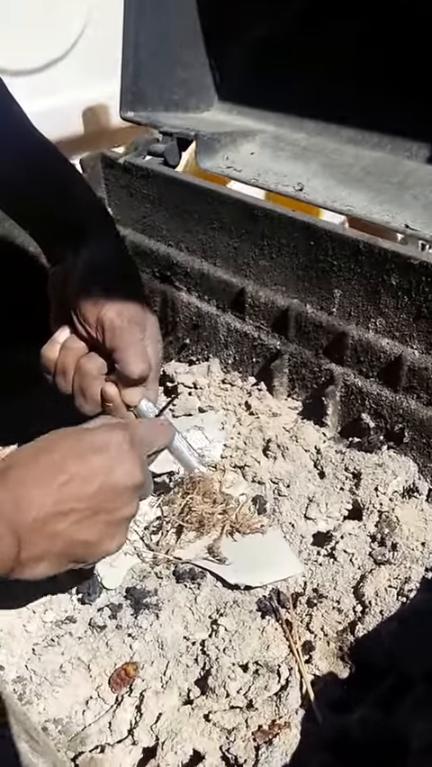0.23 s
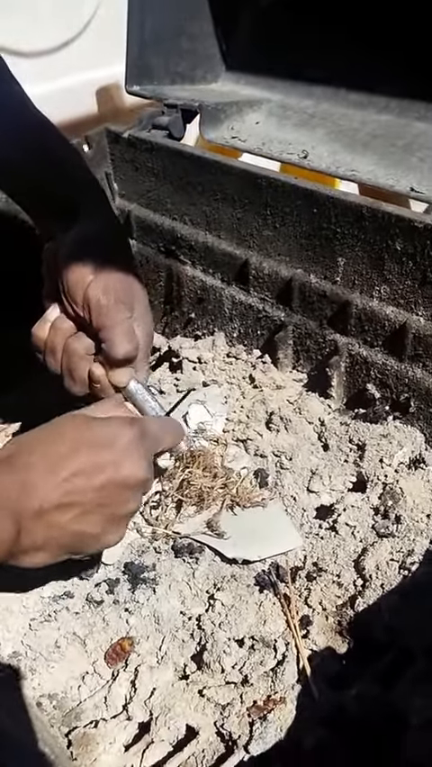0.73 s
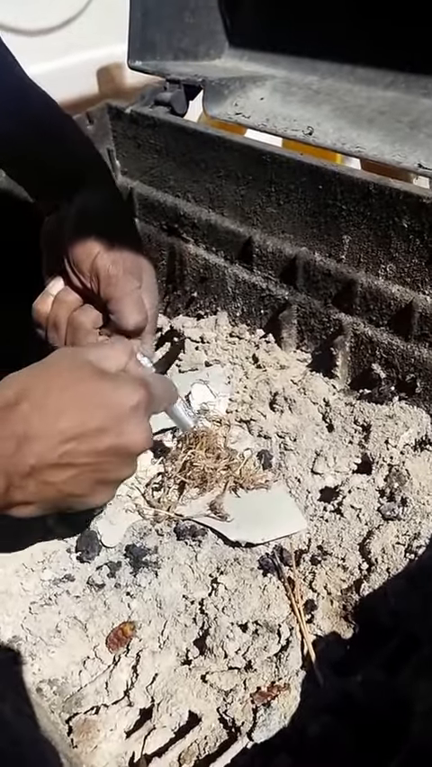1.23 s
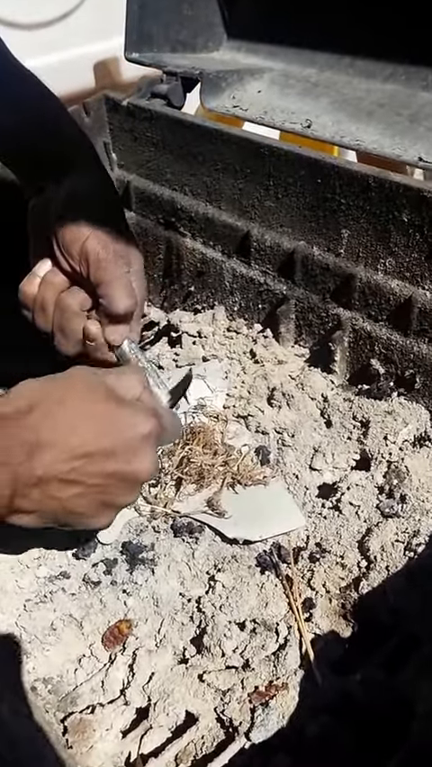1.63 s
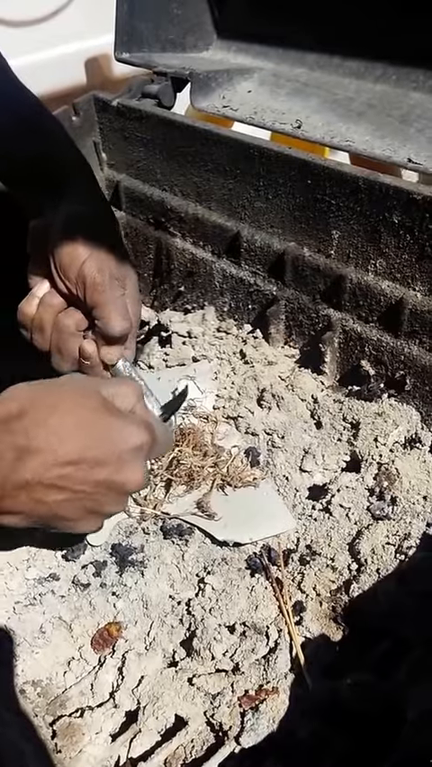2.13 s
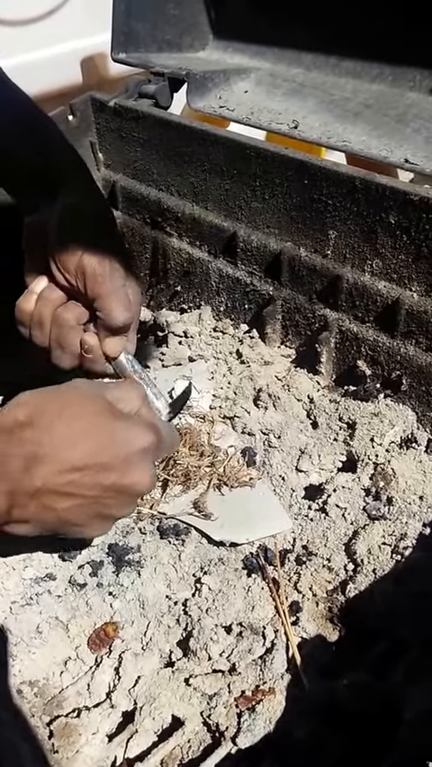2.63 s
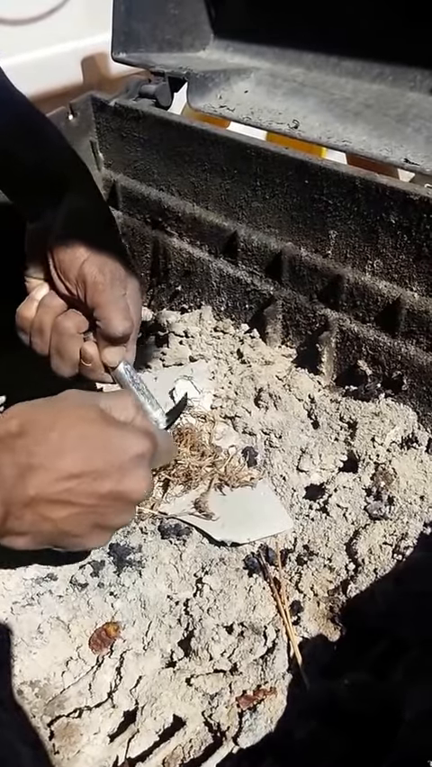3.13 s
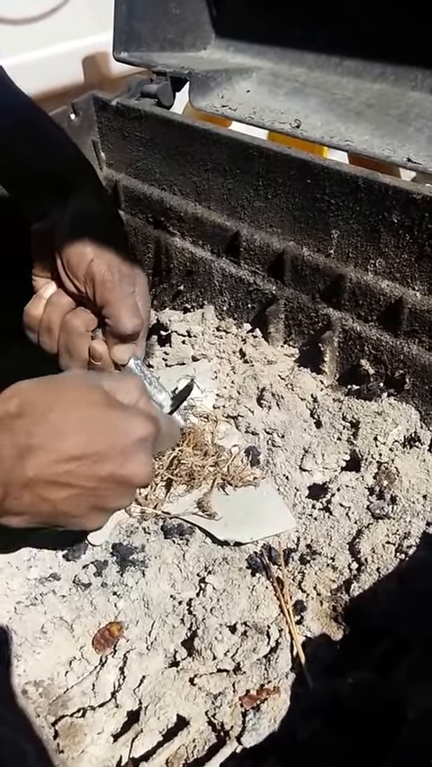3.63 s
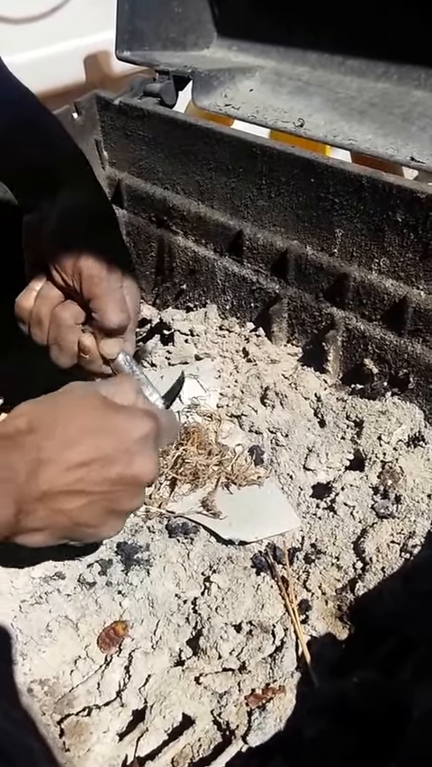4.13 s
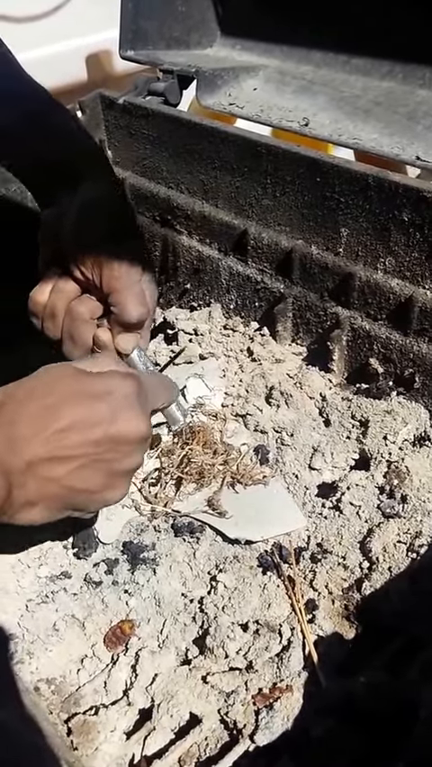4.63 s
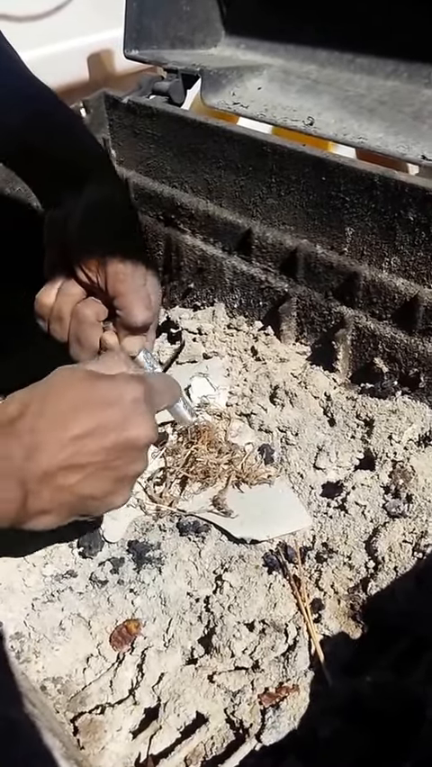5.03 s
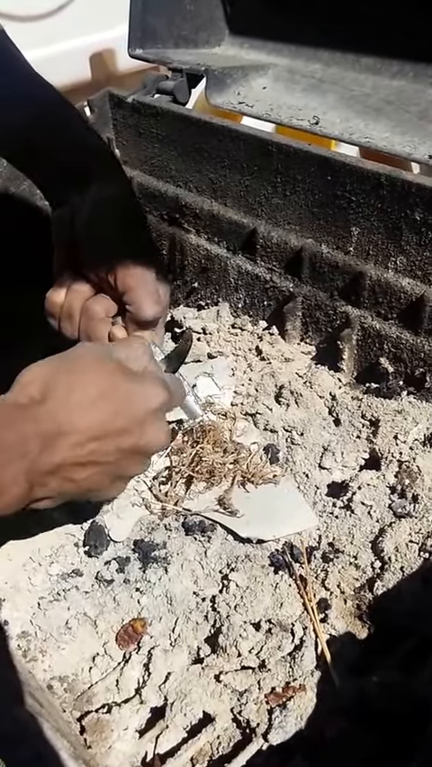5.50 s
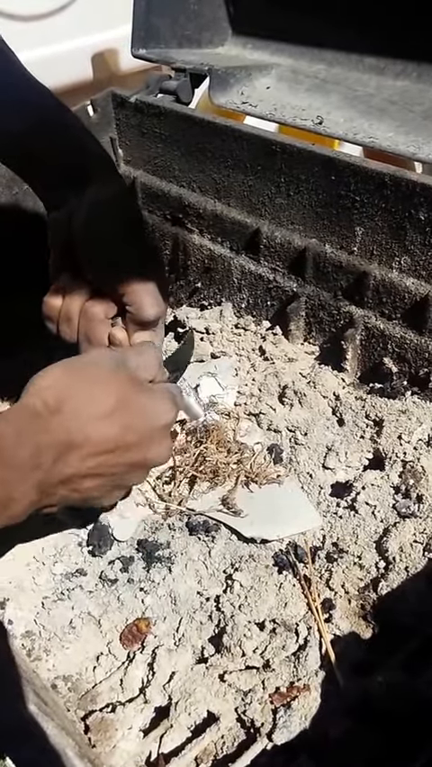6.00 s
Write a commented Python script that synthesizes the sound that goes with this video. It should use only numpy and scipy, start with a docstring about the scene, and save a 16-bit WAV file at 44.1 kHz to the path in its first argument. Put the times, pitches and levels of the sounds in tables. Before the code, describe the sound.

Fast, sharp metallic scraping, a steady run of short fizzy zips with a faint dry rasp, close up in open air with small gusts.

```python
"""A steel blade scrapes a magnesium rod in quick hard strokes, about twelve a second, in a charcoal grill outdoors.
Each stroke is shaped noise: a bright hiss and fizz from the edge, a lower rasp as it digs in.
The strokes also ring the blade's decaying modes and short low tones in the rasp; catches add short sine bursts.
Decaying noise echoes the grill and yard; filtered noise makes air and gusts, a wavering sine a faint hum.
A limiter holds the loudest peaks."""
import sys
import numpy as np
from scipy import signal
from scipy.fft import rfft, irfft, next_fast_len
from scipy.io import wavfile
from scipy.ndimage import uniform_filter1d, minimum_filter1d

SR = 44100
rng = np.random.default_rng(int(sys.argv[2]) if len(sys.argv) > 2 else 0)


def master_out(mix):
    """Clip the mix to full scale and print it as 16-bit PCM to the path in sys.argv[1]."""
    frames = np.transpose(np.atleast_2d(mix))
    ceiling = np.clip(frames, -1, 1)
    pcm = np.round(ceiling * 32767).astype(np.int16)
    wavfile.write(sys.argv[1], SR, pcm)


N = 276066

# blade modes: (frequency [Hz], relative level [dB], t60 [s], right against left [dB])
BLADE_MODES = [(7490, -12, .013, 2), (9840, -27.5, .035, -7), (9940, -1, 0.015, -12), (9000, 3, 0.016, -5)]


def amp(db):
    """Decibels to amplitude."""
    return 10 ** (np.asarray(db) / 20)


def sides(right_db):
    """Stereo gain: left 0 dB, right as given."""
    return amp([[0], [right_db]])


def evened(x):
    """Scales each channel to unit RMS."""
    return x / np.sqrt(np.mean(x ** 2, axis=-1, keepdims=True) + 1e-20)


def add(mix, start_s, sound):
    """Mixes a stereo sound in at start_s, or at 0 if that is earlier."""
    first = max(round(start_s * SR), 0)
    part = mix[:, first:][:, :sound.shape[1]]
    part += sound[:, :part.shape[1]]


def gains(table, hz):
    """Interpolates each level column of a spectrum over log frequency."""
    table_hz, *columns_db = np.transpose(table)
    return amp([np.interp(np.log(hz + 1), np.log(table_hz), db) for db in columns_db])


def colour(x, table, shift=1, tilt_db_per_octave=0, still_hz=8000):
    """Filters x by a spectrum, left at unit power; it slides above still_hz and tilts above 900 Hz."""
    size = next_fast_len(x.shape[-1] + 256)
    hz = np.fft.rfftfreq(size, 1 / SR)
    slide = np.interp(hz, [still_hz, still_hz + 1200], [1, shift])
    tilt = amp(tilt_db_per_octave * np.log2(np.maximum(hz, 900)))
    gain = gains(table, hz / slide) * tilt
    gain /= np.sqrt(np.mean(gain[0] ** 2))
    return irfft(rfft(x, size) * gain, size)[:, :x.shape[-1]]


def wander(size, hz):
    """Smooth random motion of unit RMS: noise under a Gaussian lowpass."""
    f = np.fft.rfftfreq(size, 1 / SR)
    lowpass = np.exp(-(f / hz) ** 2) * (f > 0)
    return evened(irfft(rfft(rng.standard_normal(size)) * lowpass, size))


def noise_pair(size, alike, delay_samples=5):
    """White noise at two microphone ports; the shared part reaches the right one later."""
    left, other = rng.standard_normal((2, size))
    right = alike * np.roll(left, delay_samples) + np.sqrt(1 - alike ** 2) * other
    return np.array([left, right])


def hum(level_db=-60, base_hz=248.6, waver_hz=5, right_db=-3):
    """A faint hum from far away: a sine of wavering frequency."""
    hz = base_hz + waver_hz * wander(next_fast_len(N), 8.5)[:N]
    turns = np.cumsum(hz) / SR
    return amp(level_db) * np.sin(2 * np.pi * turns) * sides(right_db)


def still_air(level_db=-40.5, right_db=-2.0):
    """Steady outdoor air: noise of fixed spectrum."""
    # (frequency [Hz], relative density [dB])
    air_spectrum = [(20, -78), (90, -68.5), (250, -76), (400, -79), (850, -75.5), (1500, -78.5),
                    (3000, -80), (5200, -83.5), (6400, -68), (7500, -71.5), (9500, -92), (12000, -90),
                    (16000, -97)]
    air = colour(noise_pair(N, alike=.6), air_spectrum)
    return amp(level_db) * air * sides(right_db)


def wind_strength(lump_db=3.0, lump_hz=12):
    """A lumpy breeze and single gusts, summed in power."""
    # (time [s], relative level [dB])
    breeze_levels = [(0, -57), (.4, -60.5), (.7, -48), (1.1, -59), (1.3, -49), (1.8, -45.5), (2.3, -48),
                     (2.55, -59), (3.05, -65), (3.3, -49), (3.8, -58), (4.4, -50.5), (4.7, -57),
                     (4.85, -47), (5.1, -74), (5.4, -66), (5.9, -49.5), (6.26, -63)]
    # (peak time [s], half length to 1/e amplitude [s], relative level [dB])
    single_gusts = [(0.117, 0.017, -38.5), (0.228, 0.014, -37), (0.687, 0.043, -44), (0.884, 0.012, -28),
                    (0.988, .025, -45), (1.292, 0.043, -36), (1.482, .03, -33), (1.961, 0.017, -33),
                    (2.125, 0.033, -43), (2.276, .025, -33), (3.192, 0.018, -38.5), (3.302, .02, -41),
                    (3.39, .035, -38), (3.541, 0.02, -37), (3.919, 0.021, -35.5), (4.009, 0.015, -34),
                    (4.26, 0.013, -41), (4.81, .035, -45), (5.608, .018, -47), (5.75, .03, -41.5),
                    (5.91, 0.033, -42), (6.173, 0.012, -42)]
    t = np.arange(N) / SR
    lumps_db = lump_db * wander(next_fast_len(N), lump_hz)[:N]
    breeze = amp(np.interp(t, *np.transpose(breeze_levels)) + lumps_db)
    power = breeze ** 2
    for peak_s, half_s, db in single_gusts:
        power += amp(db) ** 2 * np.exp(-2 * ((t - peak_s) / half_s) ** 2)
    return np.sqrt(power)


def wind(level_db=6.0, right_db=-11.5):
    """Gusts buffet the microphone: low noise, mostly in the left port, follows the wind strength."""
    # (frequency [Hz], relative level [dB])
    wind_spectrum = [(15, -22), (40, -1.5), (90, 3.5), (140, -3), (200, -13.5), (320, -29), (800, -50),
                     (3000, -82)]
    eddies = colour(noise_pair(N, alike=.2), wind_spectrum)
    # level out the noise's own swells, over 50 ms
    eddies /= np.sqrt(uniform_filter1d(eddies ** 2, size=2200) + 0.04)
    return amp(level_db) * wind_strength() * eddies * sides(right_db)


def grill(x, near_db=-17, near_t60=0.031, far_db=-27, far_t60=0.59):
    """Quick reflections between the grill's walls and a faint yard tail, as decaying noise; t60 in s."""
    t = np.arange(SR // 2) / SR
    near, far = rng.standard_normal((2, 2, len(t))) * (t > .001)
    near = evened(near * amp(-60 * t / near_t60))
    far = evened(far * amp(-60 * t / far_t60))
    echoes = (amp(near_db) * near + amp(far_db) * far) / np.sqrt(len(t))
    return signal.oaconvolve(x, echoes, axes=1)[:, :N]


def catches(level_db=-0.5, width_s=.002, waver=0.017):
    """Where the edge catches it judders briefly near the blade's lowest mode: Gaussian sine bursts."""
    # (time [s], relative level [dB]); each burst peaks width_s later
    catch_events = [(0.018, -8), (1.252, -10), (1.281, -11), (1.361, -4.5), (1.85, -12), (1.932, -12),
                    (2.095, -24), (2.339, -8), (2.665, -5), (2.846, -3), (2.994, -10.5), (3.443, -23),
                    (3.588, -7.5), (3.731, -10), (4.006, -10.5), (4.284, -12), (4.562, -4), (4.575, -4),
                    (4.692, -16), (4.937, -7.5), (5.023, -9), (5.298, -5)]
    out = np.zeros((2, N))
    t = np.arange(-512, 512) / SR
    swell = np.exp(-(t / width_s - 1) ** 2 / 2)
    mode_hz, _, _, right_db = BLADE_MODES[0]
    for start_s, db in catch_events:
        hz = mode_hz * (1 + waver * (2 * rng.random() - 1))
        turns = hz * t + rng.random((2, 1))
        burst = swell * np.sin(2 * np.pi * turns)
        add(out, start_s + t[0], amp(db + level_db) * burst * sides(right_db))
    return out


def ring(force, table):
    """Ringing: a table of decaying sines driven by a stereo force."""
    t = np.arange(4096) / SR
    tones = np.zeros((2, len(t)))
    for hz, db, t60, right_db in table:
        tones += amp(db - 60 * t / t60) * np.sin(2 * np.pi * hz * t) * sides(right_db)
    tones /= np.linalg.norm(tones[0])
    return signal.oaconvolve(force, tones, axes=1)[:, :N]


def pressure(t, length, rise, level_db, swell_db):
    """The edge lands at t = 0, bites, rides the rod in one leaning arch and lifts off."""
    arch_db = 1.5  # the hand presses harder in mid-stroke
    firm_share, ease_share = 0.2, 0.75  # of the stroke: grip set, grip begins to ease
    touch_db, ease_db, leave_db, release_s = -14.5, -9, -14, 0.0076
    bite = level_db - (arch_db + swell_db) / 2
    finish = level_db - (arch_db - swell_db) / 2
    times = [t[0], 0, rise, length * firm_share, length / 2,
             length * ease_share, length, length, length + release_s]
    levels = [bite - 22, bite + touch_db, bite, bite, level_db + arch_db / 2,
              finish, finish + ease_db, finish + leave_db, finish - 54]
    return amp(np.interp(t, np.maximum.accumulate(times), levels, right=-np.inf))


def landing(t, rise, knock_db=4, knock_s=0.00099, soft_rise_s=0.0045):
    """An edge that bites at once lands with a small knock, weaker for a slow bite."""
    softness = np.exp(-rise / soft_rise_s)
    return amp(knock_db) * softness * np.exp(-abs(t) / knock_s) * (t >= 0)


def slips(size, chatter_hz=170, chatter_db=-0.2, grain_hz=1300, grain_db=0.04):
    """Stick and slip as level wander: uneven chatter, with finer grain as the chips tear off."""
    chatter = chatter_db * wander(size, chatter_hz)
    grain = grain_db * wander(size, grain_hz)
    return evened(amp(chatter + grain))


def travelling(x, depth_db, patch_hz=420, patch_s=0.022):
    """As the contact travels along the rod, narrow resonances swell and fade: random STFT gains."""
    z = signal.stft(x, nperseg=256, noverlap=192)[2]
    field = rng.standard_normal(z.shape[1:])
    field = uniform_filter1d(field, max(round(patch_hz * 256 / SR), 1), axis=0)
    field = uniform_filter1d(field, max(round(patch_s * SR / 64), 1), axis=1)
    gain = amp(depth_db * field / field.std())
    gain /= np.sqrt(np.mean(gain ** 2))
    return signal.istft(z * gain, nperseg=256, noverlap=192)[1][:, :x.shape[1]]


def edge_hiss(size, hz):
    """The edge hisses and its finest chips fizz above; a lower hiss fizzes more and spreads right."""
    # both: (frequency [Hz], relative left level [dB], relative right level [dB])
    hiss_spectrum = [(3770, -48.5, -42.5), (5010, -23, -17.5), (5600, -24, -17.5), (6820, -20, -14),
                     (7433, -9.5, 0.5), (8050, -16.5, -5.5), (8730, -9.5, -5), (9030, -4.5, -8),
                     (9700, 1.5, -7.5), (10080, -4.5, -21), (10790, -10.5, -14.5), (11310, -18.5, -27),
                     (13500, -35, -41)]
    fizz_spectrum = [(9500, -37, -33), (11400, 4, -20), (13200, 3.5, -17), (15100, 7, -1),
                     (15900, 2.5, -13)]
    usual_hz, hiss_db = 9490, 0.55
    sharp_khz = (hz - usual_hz) / 1000
    fizz_db = -15 - 16.5 * sharp_khz
    right_db = -9 - 12.5 * sharp_khz
    hiss = travelling(noise_pair(size, alike=0.21), depth_db=4.5)
    hiss = evened(colour(hiss, hiss_spectrum, hz / usual_hz)) * sides(right_db)
    fizz = travelling(noise_pair(size, alike=0.092), depth_db=3.5)
    fizz = colour(fizz, fizz_spectrum) * slips(size, chatter_db=2.0, grain_db=3.5)
    return amp(hiss_db) * hiss + amp(fizz_db) * fizz


def rasp_crumbs(size, start):
    """Coarse rasp noise of unit spread, whose brightness follows the time of the stroke."""
    # (frequency [Hz], relative left level [dB], relative right level [dB])
    rasp_spectrum = [(200, -37, -30), (474, -20, -41), (647, -25.5, -41), (897, -5, -18.5),
                     (1115, -19, -23.5), (1343, -9.5, -5), (1570, -6.5, -11.5), (2050, -8.5, -6.5),
                     (2120, -4.5, -12.5), (2815, -11.5, -11), (3030, -2.5, -0.5), (3670, -8.5, -9),
                     (4870, -1, -2), (6700, -44, -50)]
    # (time [s], tilt [dB per octave]); the first strokes sound duller
    rasp_tilt = [(0, -9.5), (.6, -3.5), (1.2, 1.5), (3, 0.5), (4.4, 2.5), (5.6, 0.5), (6.26, -1)]
    tilt = np.interp(start, *np.transpose(rasp_tilt))
    crumbs = travelling(noise_pair(size, alike=0.63), depth_db=6.5)
    crumbs = colour(crumbs, rasp_spectrum, tilt_db_per_octave=tilt)
    return crumbs / crumbs.std()


def scraping(rasp_db=-1.0, blade_db=-17.0, tone_db=-6, dig_db=5.0, crunch_db=2.5, knock_share=0.4):
    """Each stroke's friction drives hiss, fizz, rasp, the blade's modes and short low tones in the rasp."""
    # (start [s], end [s], time to bite [s], relative hiss level [dB],
    #  swell from bite to finish [dB], relative rasp level [dB], hiss pitch [Hz])
    strokes = [(0.0, 0.042, 0.0007, -6, -16, -37, 9850), (.066, .125, 0.0058, -5.5, 8.5, -36, 9560),
               (.15, 0.202, 0.0017, -8, -1, -38, 9500), (0.234, 0.281, .005, -9, -1, -43, 9530),
               (.296, .359, 0.0041, -8, 8, -45, 9530), (0.383, 0.45, 0.0063, -10, -1.5, -34.5, 9570),
               (0.465, 0.529, .005, -7.5, 0, -38.5, 9520), (.551, 0.614, 0.0081, -8.5, 6, -32, 9600),
               (0.624, 0.64, .004, -21.5, 11, -46, 9300), (0.645, 0.702, 0.0017, -8, -7, -35.5, 9640),
               (.722, 0.769, .01, -13, 7.5, -41.5, 9500), (.781, 0.824, 0.0036, -11, 5, -36.5, 9360),
               (0.861, .926, 0.0044, -7, 1, -30.5, 9240), (.959, 1.044, 0.014, -18, 8, -38, 9280),
               (1.07, 1.129, 0.0057, -10.5, -1.5, -29.5, 9320),
               (1.145, 1.205, 0.0013, -11.5, 3.5, -32.5, 9150),
               (1.236, 1.303, 0.0094, -7.5, 3.5, -28.5, 9220), (1.331, 1.386, .001, -15, 1, -40, 9100),
               (1.41, 1.474, 0.0067, -12, 5.5, -34.5, 9300), (1.49, 1.55, 0.0062, -9.5, -1, -31, 9500),
               (1.575, 1.634, 0.0028, -6, 4.5, -28.5, 9560), (1.652, 1.715, 0.0062, -9, -1, -33, 9540),
               (1.738, 1.799, 0.0085, -7, 4, -27.5, 9450), (1.817, 1.873, 0.0024, -10.5, 0, -29.5, 9300),
               (1.9, 1.964, .003, -7, 3, -26.5, 9360), (1.981, 2.04, 0.0026, -8.5, 1, -31, 9430),
               (2.067, 2.123, 0.0033, -8.5, -1, -31.5, 9460),
               (2.142, 2.197, 0.0034, -9.5, -2.5, -27.5, 9180), (2.224, 2.286, 0.0054, -7, 1.5, -31, 9400),
               (2.299, 2.363, .001, -10, 5, -32, 9200), (2.385, 2.457, 0.0073, -7.5, 1.5, -28, 9300),
               (2.474, 2.538, 0.01, -12, 0.5, -28, 9140), (2.559, 2.623, 0.0044, -6.5, 0.5, -29, 9480),
               (2.639, 2.701, 0.0028, -12, 5, -25.5, 9160), (2.727, 2.785, 0.0022, -6, 3, -26.5, 9520),
               (2.809, 2.867, .004, -9, 4, -26, 9150), (2.894, 2.953, 0.0045, -6, 5, -30.5, 9570),
               (2.97, 3.035, 0.0095, -11, 4, -26, 9330), (3.056, 3.122, .005, -8.5, 9, -28, 9540),
               (3.151, 3.209, .002, -6, -1, -26, 9500), (3.232, 3.291, 0.0044, -7, 3, -28, 9400),
               (3.313, 3.375, .001, -7.5, 2.5, -29.5, 9520), (3.393, 3.457, 0.0069, -4.5, 4, -24.5, 9380),
               (3.482, 3.541, 0.00089, -7, -1.5, -27.5, 9380), (3.561, 3.623, 0.0027, -7, 2, -28, 9580),
               (3.64, 3.702, .004, -7, -3.5, -29, 9420), (3.721, 3.777, 0.0059, -7, 5.5, -25.5, 9450),
               (3.799, 3.805, .001, -12.5, -4, -47, 9700), (3.822, 3.842, 0.0012, -5.5, -5, -31, 9600),
               (3.895, 3.937, .002, -11, -4, -39.5, 9450), (3.967, 4.037, 0.0025, -10, -6, -26.5, 9480),
               (4.077, 4.117, .002, -12.5, -2.5, -30.5, 9340), (4.251, 4.315, 0.003, -7.5, 9, -29.5, 9380),
               (4.338, 4.411, 0.0089, -13.5, -3.5, -29, 9100),
               (4.444, 4.511, 0.0099, -10, 0.5, -29.5, 9080), (4.538, 4.6, .002, -11.5, -3, -27, 9200),
               (4.627, 4.709, 0.0081, -7.5, 2.5, -24.5, 9160), (4.755, 4.804, 0.0049, -19, 7, -42, 9220),
               (4.861, 4.897, 0.0031, -21, 4.5, -37, 9330), (4.921, 4.973, .01, -12, -1.5, -28.5, 9100),
               (5.007, 5.079, 0.016, -6, 2, -29.5, 9420), (5.107, 5.168, .001, -11, -2, -33.5, 9300),
               (5.191, 5.249, 0.0079, -7, 4.5, -25.5, 9400), (5.274, 5.336, 0.0014, -11, -2.5, -24, 9160),
               (5.356, 5.427, 0.0064, -7, 2, -26, 9300), (5.442, 5.507, 0.012, -13.5, -4, -25.5, 9010),
               (5.528, 5.588, .003, -8.5, 5, -30, 9400), (5.608, 5.662, 0.0017, -13, 4, -29, 9260),
               (5.684, 5.751, 0.0057, -7, 4.5, -26, 9470), (5.772, 5.832, .002, -12.5, -1.5, -33.5, 9620),
               (5.856, 5.899, 0.0065, -14.5, 5, -44.5, 9460), (5.918, 5.966, 0.0078, -14, -6, -34.5, 9200),
               (6.006, 6.07, 0.006, -6.5, 4.5, -27.5, 9620), (6.088, 6.152, 0.0023, -9, 5, -33.5, 9320),
               (6.18, 6.245, 0.01, -6, 5.5, -28.5, 9500)]
    # short decaying tones within the rasp:
    # (frequency [Hz], relative level [dB], t60 [s], right against left [dB])
    rasp_tones = [(920, -4, 0.062, -21), (1364, 2, 0.039, -22), (1987, 2.5, 0.05, -8.5),
                  (2397, 0.5, 0.065, 4), (2520, -10, 0.028, -6), (3166, 7.5, 0.062, -15),
                  (3400, 6, 0.068, -6), (4197, 2, 0.12, -5)]
    out, on_blade, on_rasp = np.zeros((3, 2, N))
    for start, end, rise, level, swell, rasp, hz in strokes:
        length = end - start
        t = np.arange(next_fast_len(int((length + .02) * SR))) / SR - .003
        size = len(t)
        knock = landing(t, rise)
        press = pressure(t, length, rise, level, swell)
        usual = np.sqrt(np.sum(press ** 2) / (length * SR))
        bite = np.interp(rise, t, press)
        friction = press * slips(size) + knock_share * bite * knock
        # the rasp grows as the edge digs in, in coarser crumbs
        dig = amp(dig_db * np.minimum(t / length, 1))
        dig = dig * evened(amp(crunch_db * wander(size, 950)))
        crunch = amp(rasp) * (friction / usual * dig + knock_share * knock)
        hiss = friction * edge_hiss(size, hz)
        rasping = amp(rasp_db) * crunch * rasp_crumbs(size, start)
        add(out, start + t[0], hiss + rasping)
        add(on_blade, start + t[0], friction * noise_pair(size, alike=0.38))
        add(on_rasp, start + t[0], crunch * noise_pair(size, alike=0.37))
    blade_ring = amp(blade_db) * ring(on_blade, BLADE_MODES)
    tone_ring = amp(tone_db) * ring(on_rasp, rasp_tones)
    return out + blade_ring + tone_ring


def scene():
    """The scraping in the grill, in the open air."""
    metal = scraping() + catches()
    return metal + grill(metal) + still_air() + wind() + hum()


def record(dry, ceiling=1.0, edge_hz=15780):
    """A fast limiter holds down the loudest peaks of each channel; then a lowpass at edge_hz."""
    allowed = np.minimum(ceiling / (abs(dry) + 1e-9), 1)
    gain = minimum_filter1d(allowed, size=21)
    gain = uniform_filter1d(uniform_filter1d(gain, size=11), size=11)
    lowpass = signal.firwin(601, edge_hz, window=("kaiser", 8), fs=SR)
    return signal.oaconvolve(dry * gain, lowpass[None], "same")


dry = scene()
out = record(dry)
master_out(out)
```